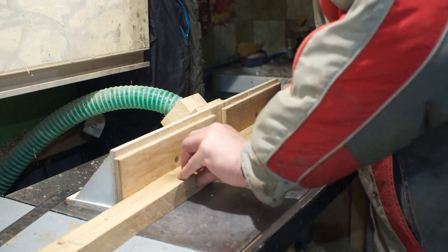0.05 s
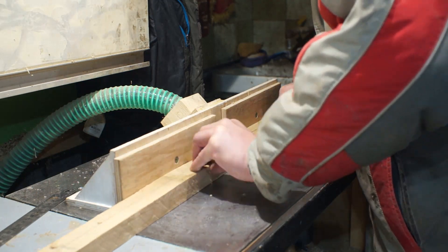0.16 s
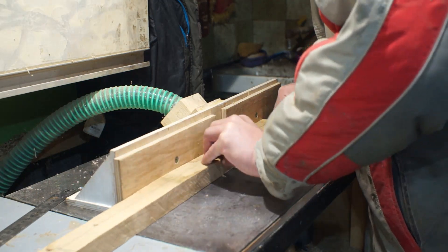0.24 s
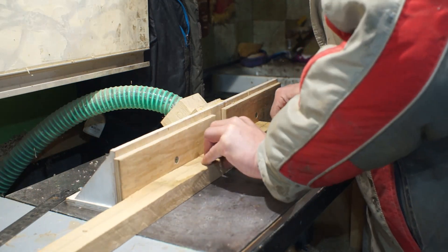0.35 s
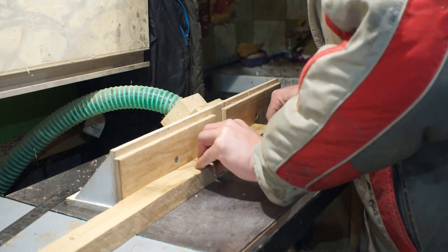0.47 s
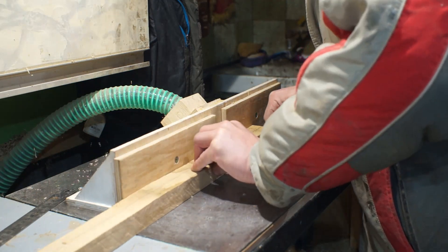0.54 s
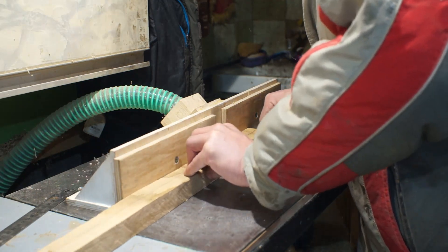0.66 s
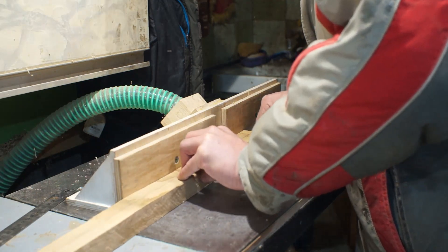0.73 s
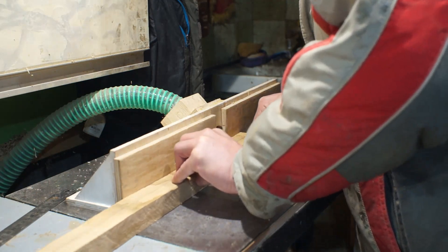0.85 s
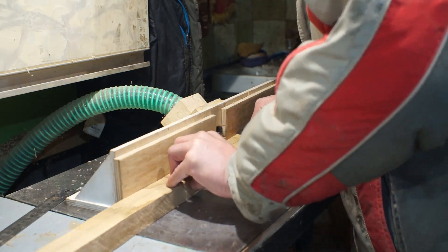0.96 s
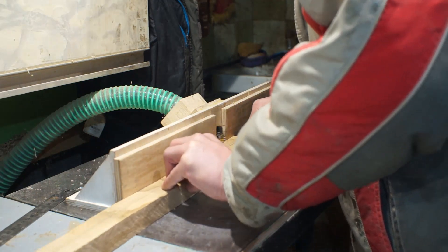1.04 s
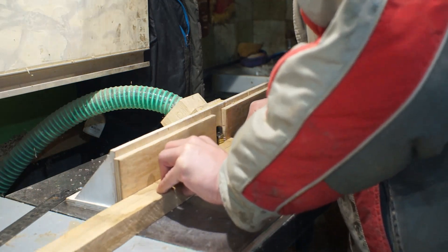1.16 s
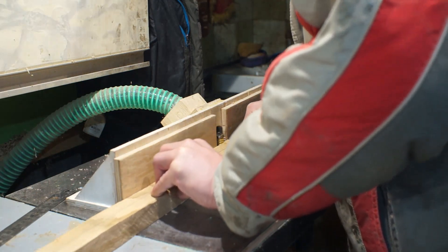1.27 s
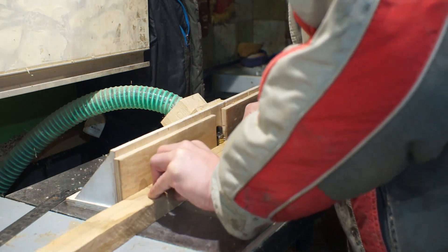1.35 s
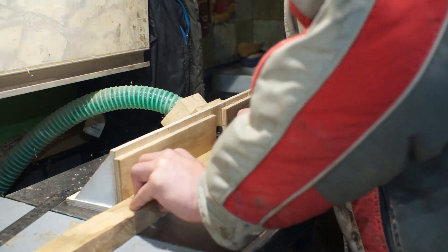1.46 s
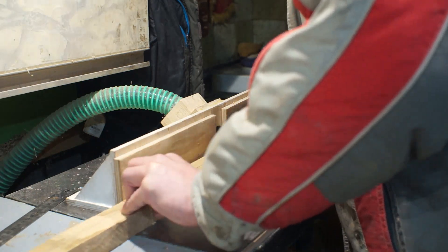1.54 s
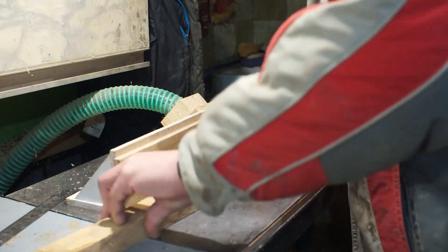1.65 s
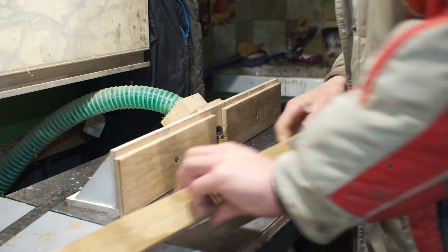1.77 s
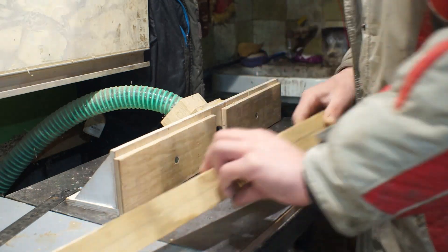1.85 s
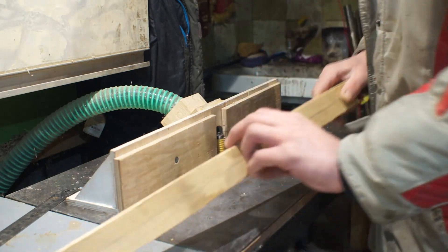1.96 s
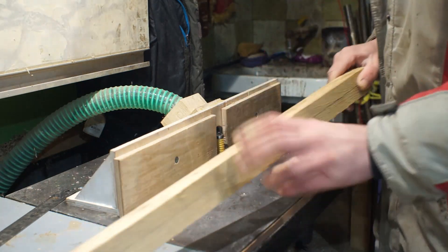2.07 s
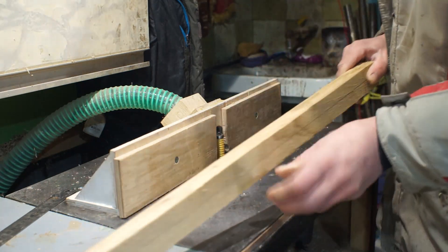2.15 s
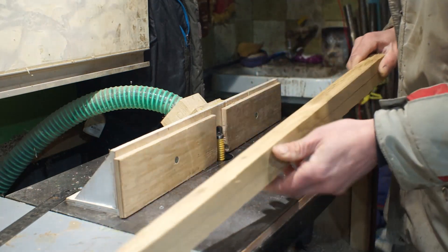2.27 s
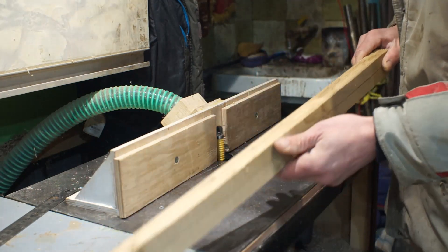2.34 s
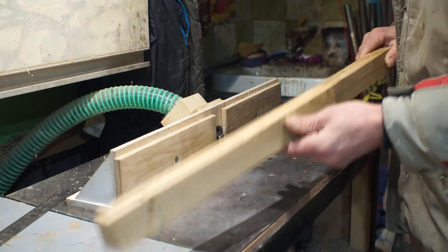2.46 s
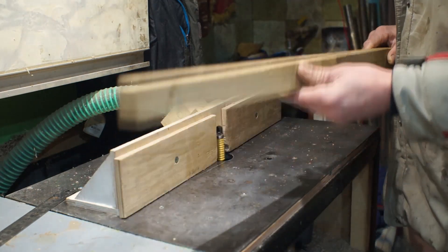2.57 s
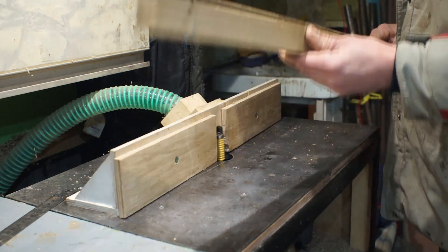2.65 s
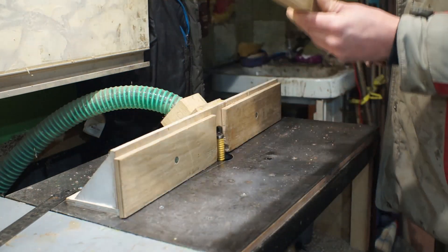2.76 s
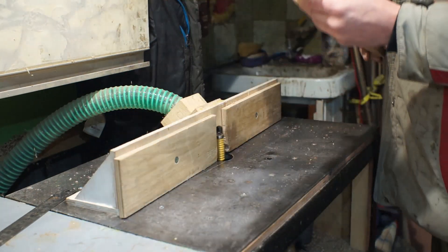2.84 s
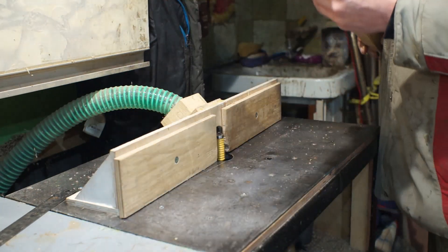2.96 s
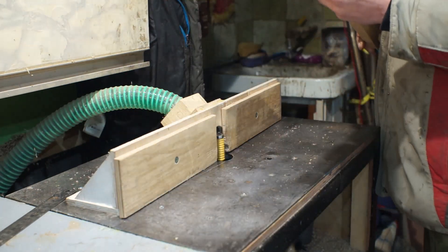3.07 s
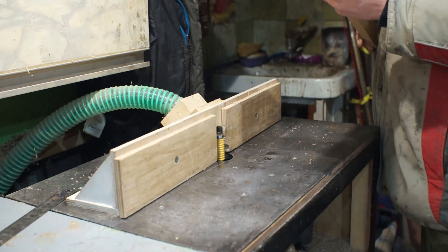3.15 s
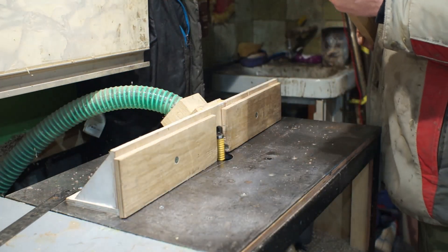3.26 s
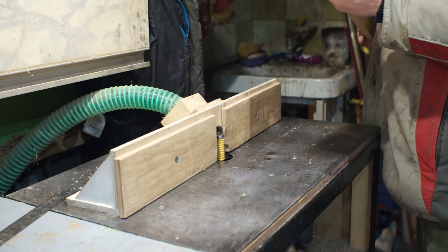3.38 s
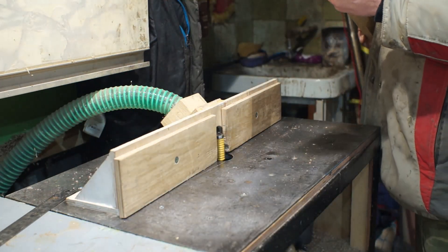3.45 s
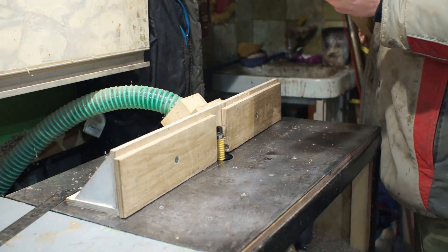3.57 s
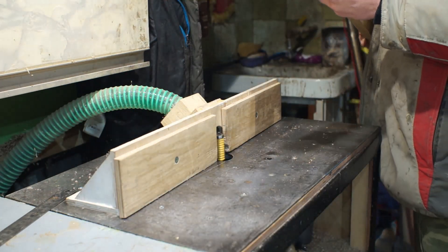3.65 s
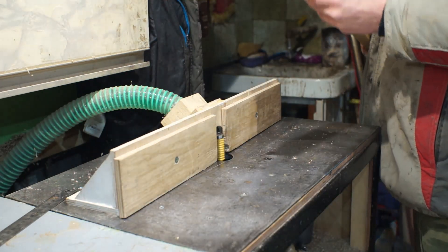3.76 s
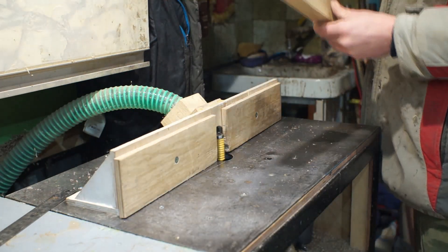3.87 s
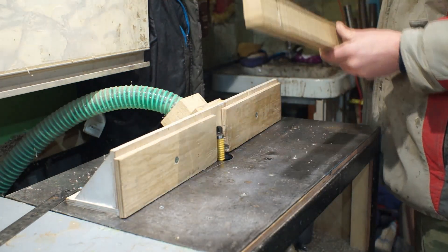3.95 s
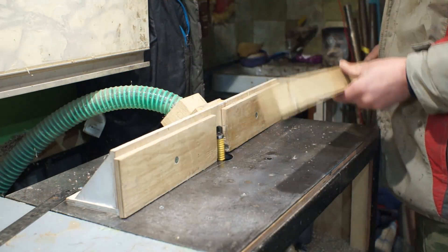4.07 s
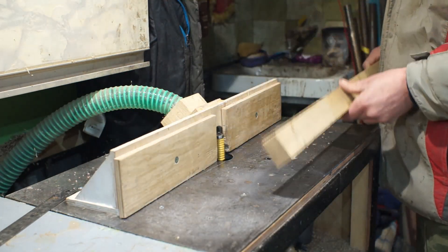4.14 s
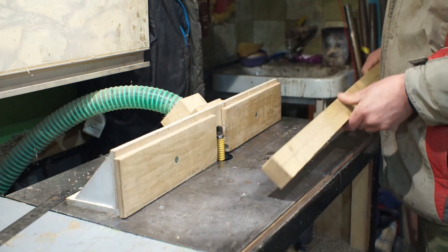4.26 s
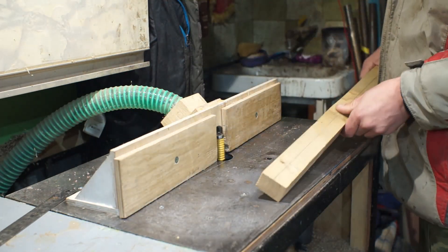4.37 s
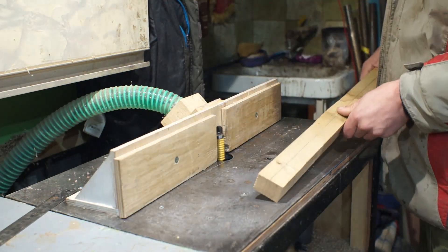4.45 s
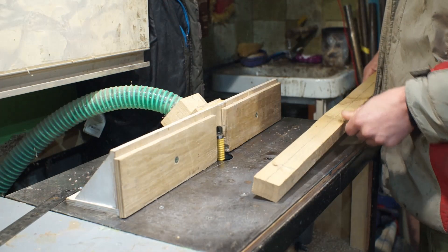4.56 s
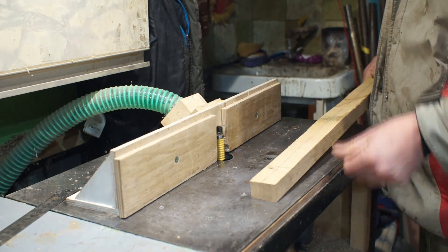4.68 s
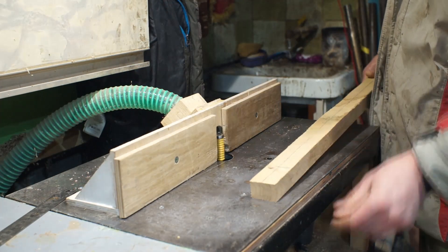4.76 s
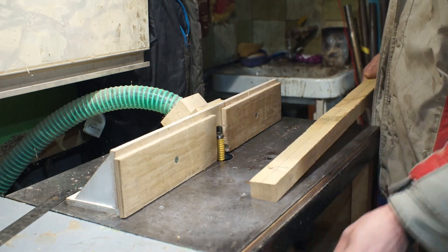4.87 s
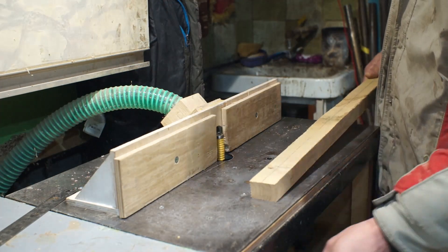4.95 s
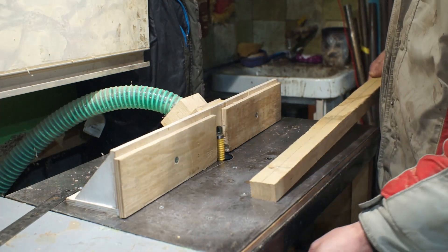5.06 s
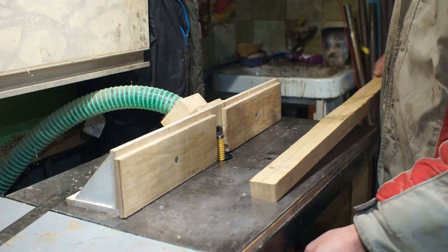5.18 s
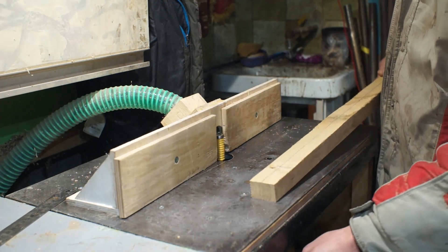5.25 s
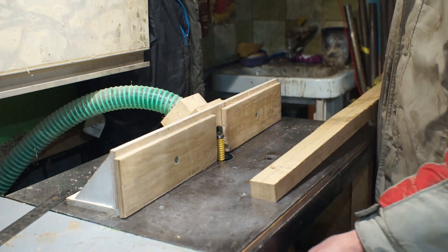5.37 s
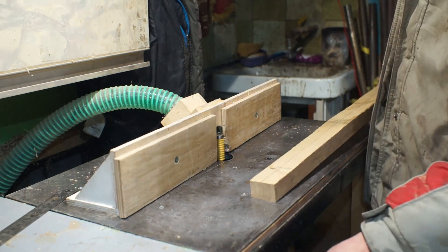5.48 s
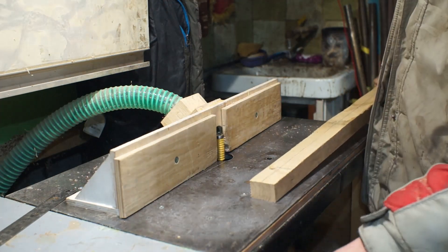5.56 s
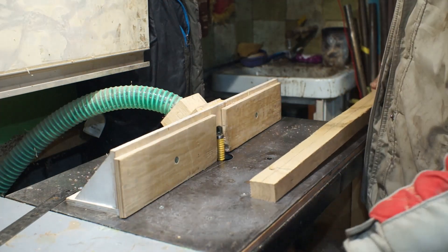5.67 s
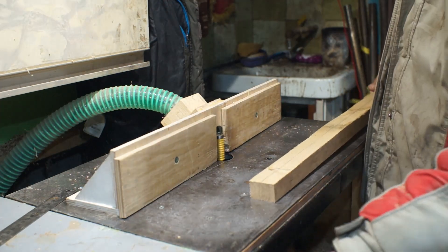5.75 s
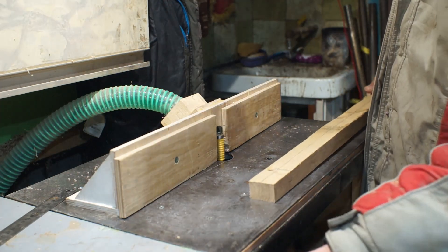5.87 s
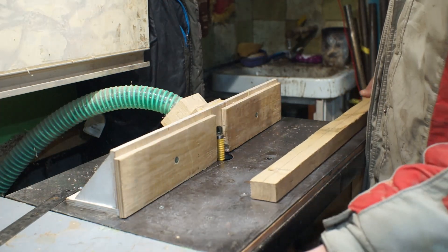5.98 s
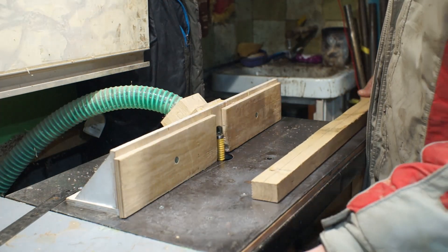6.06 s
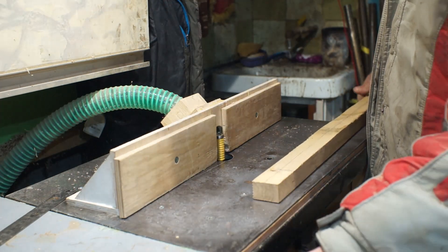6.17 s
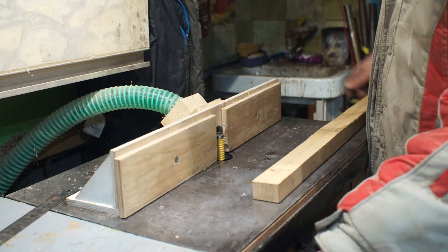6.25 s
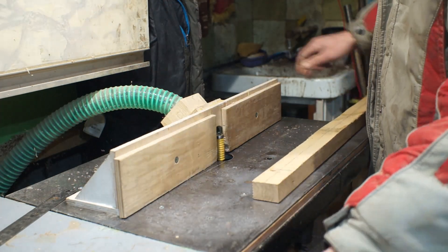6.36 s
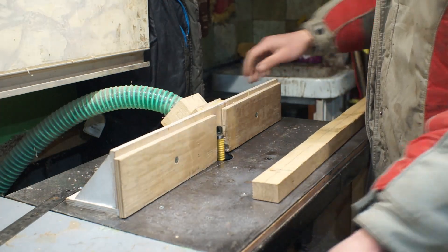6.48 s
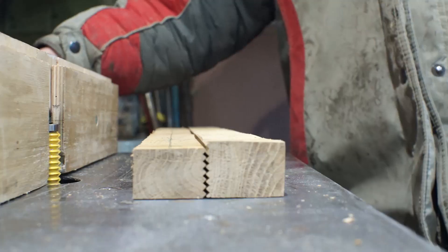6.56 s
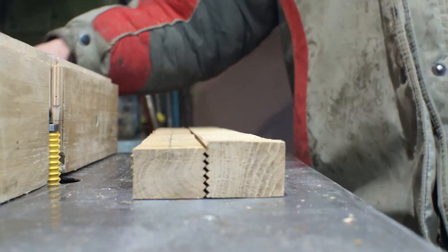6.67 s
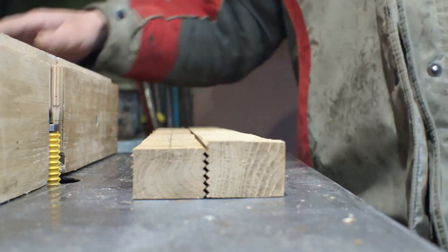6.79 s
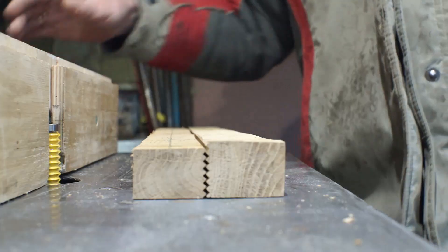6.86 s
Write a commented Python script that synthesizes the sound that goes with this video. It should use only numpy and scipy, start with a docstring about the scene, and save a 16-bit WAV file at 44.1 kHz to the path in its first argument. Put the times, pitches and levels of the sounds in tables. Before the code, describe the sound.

From 0 to about 1.45 s a table router cuts a wooden strip at close range: a dense buzzing motor tone, strained and wavering, with coarse rasp, hissing chips and bouts of growling or squealing chatter, the strongest around 0.5 to 0.9 s, and harder digs near 0.9 and 1.05 s. The strip rings brighter towards its end. The wood then clears and the pitch quickly rises to a steady, slightly fluttering whine with rushing air and a dust extractor's hum. The wide stereo image narrows at about 1.8 s. This free running holds until 5.43 s, when the router is switched off and its pitch glides down, swelling and shuddering through resonances; the extractor begins falling too at 6.2 s. At 6.53 s the machines stop abruptly. In a quiet, softly noisy workshop, wood scrapes from about 6.6 s and two strips knock together near 6.9 s.

```python
"""In a workshop, a table router with a finger-joint bit mills a wooden strip, runs free at about 20 500 rpm,
and is switched off. Overtones of one shaft make its voice: the cut slows it, and coasting sweeps it past
the table's resonances. Shaped noise and knife blows make the rasp and chips; the strip rings and chatters.
A dust extractor hums alongside. The sound is wide at first, then narrow. It cuts abruptly from the coasting
machines to a quiet workshop, where two strips slide together as scraping noise with knocks."""
import sys
import numpy as np
from scipy import signal
from scipy.fft import rfft, irfft
from scipy.io import wavfile

SR = 44100
rng = np.random.default_rng(int(sys.argv[2]) if len(sys.argv) > 2 else 0)


def generate_wav(signal):
    """Clip the signal to [-1, 1] and save it as 16-bit WAV at the path in sys.argv[1]."""
    frames = np.transpose(np.atleast_2d(signal))
    scaled = np.clip(frames, -1, 1) * 32767
    pcm = np.round(scaled).astype(np.int16)
    wavfile.write(sys.argv[1], SR, pcm)


N = 305172
TIME = np.arange(N) / SR
FREQS = np.arange(N // 2 + 1) * SR / N

NARROW_S = 1.791  # the sound is narrow from here
SCENE_CUT_S = 6.527  # the scene cuts from the machines to the quiet room here
WIDE = np.clip((NARROW_S - TIME) / .0003, 0, 1)  # 1 while wide, 0 while narrow
OFF_S, COAST_S = 5.43, 1.956  # the router is switched off; time constant of its run-down
POWERED = np.interp(TIME, [OFF_S, OFF_S + .03], [1, 0])
RIPPLE_HZ = 100  # the pulsing of the mains power
MAINS = 2 * np.pi * RIPPLE_HZ * TIME
FREE_HZ, FULL_LOAD_HZ = 342.5, 302.5  # shaft turns per second, running free and in a heavy cut
CLEAR_S, RECOVER_S = 1.447, .048  # the wood leaves the bit; time constant of the speed-up
EXIT_RELEASE_S = 0.0091  # time constant with which the cutting sound dies away
DIG_ATTACK_S, DIG_RELEASE_S, DIG_SWELL_DB = 0.053, .035, 7  # each dig also swells the second order


def undb(db):
    """Turn decibels into gain."""
    return 10 ** (np.asarray(db) / 20)


def curves(table):
    """Draw each column of a table as a line through time."""
    s, *columns = np.transpose(table)
    return [np.interp(TIME, s, c) for c in columns]


def unit(x):
    """Scale to rms 1."""
    return x / np.sqrt(np.mean(x ** 2))


def walk(rate):
    """Wander smoothly at random, with a spread a little under 1, changing about rate times a second."""
    at = TIME * rate
    return 0.94 * np.interp(at, np.arange(4096), rng.standard_normal(4096))


def after(s, time_constant):
    """Stay at 1 until the moment s, then die away."""
    return np.exp(-np.maximum(TIME - s, 0) / time_constant)


def bursts(table, attack, release):
    """Gain of a row of events that each rise, hold and die away."""
    out = 0
    for s, length, db in table:
        rise = np.clip((TIME - s) / attack, 0, 1)
        out = out + undb(db) * rise * after(s + length, release)
    return out


def colour(x, spectrum):
    """Give a white signal of rms 1 a spectrum in dB per Hz."""
    hz, db = np.transpose(spectrum)
    gain = undb(np.interp(np.log(FREQS + 1), np.log(hz), db))
    return irfft(rfft(x) * gain * np.sqrt(SR / 2), N)


def ears(side_db):
    """White noise for two ears: unrelated while the sound is wide, more alike afterwards."""
    mid, side = rng.standard_normal((2, N))
    width = WIDE + (1 - WIDE) * undb(side_db)
    return (mid + np.array([[1], [-1]]) * width * side) / np.sqrt(1 + width ** 2)


def scatter(x, t60):
    """Dense reflections off table and fence, different for each ear, dying by 60 dB in t60 seconds."""
    t = TIME[:8192]
    echoes = rng.standard_normal((2, len(t))) * np.exp(-np.log(1000) * t / t60)
    echoes /= np.sqrt(np.sum(echoes ** 2, axis=1, keepdims=True))
    return signal.fftconvolve(x[None], echoes, axes=1)[:, :N]


def tone(turns, db, wide_lag, narrow_lag=1.0):
    """One pure tone whose phase differs between the ears by a lag in radians."""
    lag = WIDE * wide_lag + (1 - WIDE) * narrow_lag
    phase = 2 * np.pi * turns
    return np.sqrt(2) * undb(db) * np.array([np.cos(phase - lag), np.cos(phase)])


def standing_waves(hz, spacing_hz=40, depth_db=5.0, drift_db=4.0):
    """Level in dB of a tone in the room: it drifts, and flutters as it glides past peaks and dips."""
    peaks = np.clip(rng.standard_normal(2048), -1.6, 1.6)
    gliding = np.interp(TIME, [1.5, 1.6, 5.43, 5.46], [1, 0, 0, 1])  # no flutter while running free
    flutter = np.interp(hz / spacing_hz, np.arange(2048), peaks)
    return gliding * depth_db * flutter + drift_db * walk(7)


# how fast the shaft turns while cutting: (time [s], speed [turns per second])
CUTTING_SPEED = [(0, 305.3), (.14, 308.7), (.27, 318.5), (.4, 310.1), (.55, 301.5), (.79, 300.6),
                 (.86, 306), (1, 298.9), (1.13, 301.4), (1.45, 301.3)]
# how fast the shaft turns while running free: (time [s], speed [turns per second])
RUNNING_FREE_SPEED = [(2.42, 342.7), (2.67, 341.3), (3.05, 344), (3.3, 345), (3.76, 341.6), (4.1, 343.1),
                      (4.35, 343), (5.1, 343.6), (5.43, 344.5)]


def shaft():
    """Speed [Hz], load (about 0-1) and free drift [Hz]: the cut drags it, it recovers, then coasts."""
    (cut_hz,), (free_hz,) = curves(CUTTING_SPEED), curves(RUNNING_FREE_SPEED)
    drag_hz = (free_hz - cut_hz) * after(CLEAR_S, RECOVER_S)
    hz = (free_hz - drag_hz) * after(OFF_S, COAST_S)
    load = drag_hz / (FREE_HZ - FULL_LOAD_HZ)
    drift = (free_hz - FREE_HZ) * POWERED
    return hz, load, drift


CRITICAL_HZ, CRITICAL_WIDTH_HZ = 272, 28  # the slowing shaft shakes the table around this speed


def shudder(hz):
    """How near the coasting shaft is to its critical speed, 0-1."""
    return (1 - POWERED) * np.exp(-((hz - CRITICAL_HZ) / CRITICAL_WIDTH_HZ) ** 2)


# shaft orders 1 to 6, before the table lifts them: (level [dB], change at full load [dB],
# change at the critical speed [dB], change with speed drift [dB per Hz])
LOW_ORDER_LEVELS = [(-49.5, -2, 3, 0.16), (-52.5, -4, -1.5, 0.7), (-56, -9, 3.5, .3), (-61.5, 4, 9.5, 1.5),
                    (-59.5, 1, 5, 1.9), (-61, -2, 4, -1.3)]
# resonances of table and fence that the orders sweep through: (frequency [Hz], width [Hz], level [dB])
TABLE_RESONANCES = [(252.7, 9, 18), (335.4, 30, 22), (415, 10, 16.4), (457, 18, 15.5), (508.2, 9.1, 19),
                    (571.5, 35, 16), (771, 55, 19), (818, 24, 13), (888, 29, 18), (1189, 27, 11),
                    (1285, 79, 12.5), (1448, 19, 13.5), (1777, 95, 18.5), (2046, 46, 20.5)]
# dips between them, and a few small lifts: (frequency [Hz], width [Hz], change [dB])
TABLE_DIPS = [(207.2, 7.2, -2), (282.5, 10, -6.5), (390, 14, -15), (492, 8.7, -12), (640, 26, 1),
              (1028, 51, -4), (1380, 32, 1)]


def low_levels(hz, load, drift):
    """Level in dB of each low order: its own strength, lifted by the resonance that it is passing."""
    grid = np.arange(4096)  # Hz
    power = 1
    for centre, width, db in TABLE_RESONANCES:
        power = power + undb(db) ** 2 / (1 + (2 * (grid - centre) / width) ** 2)
    lift_db = 10 * np.log10(power)
    for centre, width, db in TABLE_DIPS:
        lift_db += db / (1 + (2 * (grid - centre) / width) ** 2)
    shake = shudder(hz)
    levels = []
    for order, (db, load_db, shake_db, drift_db) in enumerate(LOW_ORDER_LEVELS, 1):
        own_db = db + load_db * load + shake_db * shake + drift_db * drift
        levels.append(own_db + np.interp(order * hz, grid, lift_db))
    digging = np.minimum(bursts(BIT_DIGS, DIG_ATTACK_S, DIG_RELEASE_S), 1)
    levels[1] = levels[1] + DIG_SWELL_DB * digging
    return levels


def hum(turns, db, throb=0.05, waver_db=0.83):
    """The shaft's unbalance shakes the table once a turn."""
    once_a_turn = tone(turns, db + waver_db * walk(25), wide_lag=2.24, narrow_lag=0.66)
    return once_a_turn * (1 + throb * POWERED * np.cos(MAINS))


# higher multiples of the shaft speed, with lines drawn between: (order)
HIGH_ORDERS = [7, 9, 10, 11, 12, 13, 14, 15, 16, 17, 19, 24, 31]
# their levels before load and room change them: (level [dB])
HIGH_ORDER_LEVELS = [-53, -53, -54, -56.5, -54, -56.5, -58.5, -62, -71, -60, -66, -70.5, -103]


def motor(turns, hz, load, levels, shimmer_db=0.98, strain_db=3.0, smear=0.03, judder=0.058,
          load_sway=0.018, throb=0.05, load_db=6.0, shudder_db=3, dip_db=0.82, lag_per_order=.22,
          bite_share=0.42, db_per_octave=5.5, wander_db=.9):
    """Overtones of the shaft judder under load, and the heavier current sways them with the mains."""
    turns = turns + load_sway * load * np.sin(MAINS)
    buzz_db = (load_db + bite_share * curves(KNIFE_BITE)[0]) * load * after(CLEAR_S, EXIT_RELEASE_S)
    buzz_db += shudder_db * shudder(hz) + db_per_octave * np.log2(hz / FREE_HZ)
    out = 0
    for order, db in enumerate(levels, 2):
        room_db = standing_waves(order * hz, spacing_hz=14, depth_db=dip_db * order, drift_db=-0.5)
        coasting_db = (1 - POWERED) * room_db
        flutter_db = (shimmer_db + strain_db * load) * walk(22) + wander_db * walk(2.97) + coasting_db
        shaky_turns = order * turns + rng.random() + judder * load * walk(60)
        out += tone(shaky_turns, db + flutter_db, wide_lag=1.02 + lag_per_order * order, narrow_lag=0.49)
    for order in range(HIGH_ORDERS[0], HIGH_ORDERS[-1] + 1):
        swell_db = buzz_db * min(1, 12 / order)  # the table shakes mostly at the lower orders
        db = np.interp(order, HIGH_ORDERS, HIGH_ORDER_LEVELS) + swell_db + standing_waves(order * hz)
        blur = (smear + judder * load) * walk(70)
        out += tone(order * turns + rng.random() + blur, db, rng.uniform(-np.pi, np.pi), narrow_lag=0.66)
    return out * (1 + throb * POWERED * np.cos(MAINS))


FAN_DB, FAN_DB_PER_HZ = -56, 4  # whistle of the motor's 16-blade fan, louder as the speed drifts up
# multiples of the shaft speed sung by the motor's commutator: (order)
COMMUTATOR_ORDERS = [32, 48]
# their levels before load and room change them: (level [dB])
COMMUTATOR_LEVELS = [-59, -80]


def rotor(turns, hz, load, drift, flicker_db=2.5, fan_load_db=-10, fan_coast_db=-6, bars_load_db=2):
    """The fan whistles, most at full speed, and the commutator bars sing under the brushes."""
    fan_db = FAN_DB + FAN_DB_PER_HZ * drift
    fan_db = fan_db + fan_load_db * np.minimum(3 * load, 1) + fan_coast_db * (1 - POWERED)
    out = tone(16 * turns, fan_db + flicker_db * walk(18), wide_lag=1.6, narrow_lag=.3)
    for order, db in zip(COMMUTATOR_ORDERS, COMMUTATOR_LEVELS):
        fade_db = standing_waves(order * hz, spacing_hz=69.24, depth_db=8, drift_db=5.5)
        bars_db = db + fade_db + bars_load_db * load
        out += tone(order * turns, bars_db, wide_lag=1.194, narrow_lag=0.036)
    return out


# colour of the rushing air, before the flow changes its level: (frequency [Hz], level [dB per Hz])
AIR_COLOUR = [(30, -101), (100, -96), (175, -94.5), (240, -82.5), (450, -81), (800, -79), (1200, -78),
              (1900, -79), (2700, -74.5), (3600, -79.5), (5500, -81.5), (8000, -83), (11000, -88),
              (15000, -94)]


def air(turns, hz, free_db=-2.0, db_per_octave=2.5, shudder_db=1.0, throb=0.12, chop=0.1, flicker_db=1.15):
    """Cooling air and brush hiss follow the speed, pulse with the mains and are chopped once a turn."""
    flow_db = free_db + db_per_octave * np.log2(hz / FREE_HZ) + shudder_db * shudder(hz)
    pulse = 1 + throb * POWERED * np.cos(MAINS) + chop * np.cos(2 * np.pi * turns)
    return colour(ears(side_db=-42) * pulse, AIR_COLOUR) * undb(flow_db + flicker_db * walk(25))


EXIT_DB, EXIT_RISE_DB_PER_S = -35, 19  # the strip rings ever louder towards its end
# how hard the knives bite; the motor's buzz follows too: (time [s], level [dB])
KNIFE_BITE = [(0, 1.5), (.18, -2.5), (.28, -7), (.44, -2.5), (.55, 0.5), (.72, -5.5), (1.17, -5.5),
              (1.25, -6), (1.45, -8)]
# the bit digs in and throws chips; also swells order 2: (start [s], length [s], level [dB])
BIT_DIGS = [(0, 0.14, -0.5), (.32, .18, 0.5), (.88, 0.17, 3), (1.04, .08, 5)]
# colour of the rasp, before the bite changes its level: (frequency [Hz], level [dB per Hz])
RASP_COLOUR = [(30, -103), (120, -82.5), (240, -81.5), (450, -67), (640, -73), (840, -64.5), (1100, -78.5),
               (1550, -69), (2000, -70.5), (2500, -71.5), (3000, -77), (4200, -77), (6000, -87),
               (12000, -102)]
# colour of the flying chips, before the spray changes their level: (frequency [Hz], level [dB per Hz])
CHIP_COLOUR = [(2000, -105), (5000, -91), (8000, -83), (11000, -89.5), (15000, -95)]
# ways the strip's end rings, relative to each other: (frequency [Hz], width [Hz], level [dB])
STRIP_MODES = [(803.3, 20.8, 7), (1110, 50, 1), (2940, 33, 12), (3056, 37.8, 10), (3313, 45, -1),
               (3950, 55, 6)]


def cutting(turns, sharpness=120, uneven_db=2.0, tear=0.95, grain_db=2.0, dust_db=-7):
    """A knife strikes once a turn, each bite of its own size; fibres tear, chips fly, the strip rings."""
    bite_db, = curves(KNIFE_BITE)
    spray = undb(bite_db + dust_db) + bursts(BIT_DIGS, DIG_ATTACK_S, DIG_RELEASE_S)
    exit_db = EXIT_DB - EXIT_RISE_DB_PER_S * np.maximum(CLEAR_S - TIME, 0)
    sizes = undb(uneven_db * rng.uniform(-2.8, 2.9, 4096))[(turns + .5).astype(int)]
    contact = np.cos(2 * np.pi * turns) - 1  # 0 at the strike, negative elsewhere
    blows = unit(np.diff(sizes * np.exp(sharpness * contact), prepend=0))
    fibres = unit(rng.standard_normal((2, N)) * sizes * np.exp(contact))
    rasp = colour(tear * fibres + undb(-7.0) * scatter(blows, t60=0.11), RASP_COLOUR) * undb(bite_db)
    grains = unit(rng.standard_normal((2, N)) * undb(grain_db * walk(420)))
    chips = colour(grains, CHIP_COLOUR) * spray
    modes = sum(undb(db) / (1 + 2j * (FREQS - hz) / width) for hz, width, db in STRIP_MODES)
    struck = scatter(blows, t60=0.017) + 1.62 * fibres
    ring = unit(irfft(rfft(struck) * modes, N)) * undb(exit_db)
    return (rasp + chips + ring) * after(CLEAR_S, EXIT_RELEASE_S)


CHATTER_ATTACK_S, CHATTER_RELEASE_S = 0.017, .025
# bouts of chatter at a multiple of the shaft speed: (start [s], length [s], multiple, level [dB])
CHATTER_BOUTS = [(0, 0.12, 6, -42), (0, 0.23, 10, -48), (0.118, 0.24, 5, -45), (0.156, 0.28, 7, -43),
                 (.39, .13, 6.5, -42), (0.456, 0.22, 3, -40), (0.465, 0.17, 4, -44),
                 (0.524, 0.32, 6.5, -33.5), (.52, 0.4, 1.5, -54.5), (0.851, .1, 6.5, -35.5),
                 (0.945, 0.16, 1.5, -45), (1.12, 0.07, 1.5, -50), (1.158, 0.24, 2, -47),
                 (1.219, .22, 9.5, -49.5), (1.27, .18, 10, -43), (1.29, 0.11, 11, -46)]


def chatter(turns, rough_db=1.5, jitter=0.022):
    """The strip bounces on the bit, growling at low multiples and squealing at high ones, unsteadily."""
    out = 0
    for s, length, multiple, db in CHATTER_BOUTS:
        order = round(2 * multiple) / 2  # it locks to whole or half orders
        shaky_turns = order * turns + rng.random() + jitter * walk(110)
        voice = tone(shaky_turns, rough_db * walk(110), wide_lag=0.89)
        out = out + voice * bursts([(s, length, db)], CHATTER_ATTACK_S, CHATTER_RELEASE_S)
    return out


EXTRACTOR_HZ, EXTRACTOR_OFF_S, EXTRACTOR_COAST_S = 511.6, 6.2, 2.3
# how loud the dust extractor's blade tone is: (time [s], level [dB])
EXTRACTOR_LOUDNESS = [(0, -51), (.4, -40), (.9, -49), (1.4, -49.5), (1.7, -42), (2.1, -49), (5.4, -47.5),
                      (6.2, -39.5), (6.5, -48)]


def extractor():
    """The blade tone of the dust extractor falls in pitch as it too runs down."""
    hz = EXTRACTOR_HZ * after(EXTRACTOR_OFF_S, EXTRACTOR_COAST_S)
    db, = curves(EXTRACTOR_LOUDNESS)
    turns = np.cumsum(hz) / SR + 0.011 * walk(10)
    return tone(turns, db + 0.86 * walk(10), wide_lag=1.5, narrow_lag=0.92)


# strips pushed over the table, relative to the scrape's colour: (start [s], length [s], level [dB])
STRIP_SLIDES = [(6.5, .03, -6), (6.63, .2, -1.5), (6.85, .08, 1.5)]
# the strips knock together, relative to the scrape's colour: (time [s], level [dB])
STRIP_KNOCKS = [(6.897, -5), (6.905, 10)]
# colour of wood scraping on the table: (frequency [Hz], level [dB per Hz])
SCRAPE_COLOUR = [(100, -118), (300, -108), (500, -99), (900, -99), (1700, -91.5), (2700, -97.5),
                 (5500, -97), (11000, -97.5), (15000, -101)]


def strips(knock_t60=0.023):
    """Wood slides over the table in small catches, then the two joints meet."""
    force = bursts(STRIP_SLIDES, attack=0.027, release=0.12) * undb(0.88 * walk(160))
    for s, db in STRIP_KNOCKS:
        fade = np.exp(-np.log(1000) * np.abs(TIME - s) / knock_t60)
        force = force + undb(db) * (TIME >= s) * fade
    return colour(ears(side_db=-13.5) * force, SCRAPE_COLOUR)


# colour of the workshop's quiet background: (frequency [Hz], level [dB per Hz])
WORKSHOP_COLOUR = [(30, -123), (150, -110), (330, -98.5), (600, -99), (1200, -104), (3600, -106),
                   (8000, -110), (15000, -113)]


def workshop():
    """Steady soft noise fills the room."""
    return colour(ears(side_db=-11.0), WORKSHOP_COLOUR)


def scene(sway=0.005, flutter=0.0015):
    """One shaft drives the whole router; mains torque ripple sways it until the power goes off."""
    hz, load, drift = shaft()
    hum_db, *overtones_db = low_levels(hz, load, drift)
    turns = np.cumsum(hz) / SR + sway * POWERED * np.sin(MAINS) + flutter * walk(30)
    router = hum(turns, hum_db) + motor(turns, hz, load, overtones_db)
    router = router + rotor(turns, hz, load, drift) + air(turns, hz)
    machines = router + cutting(turns) + chatter(turns) + extractor()
    before_cut = np.clip((SCENE_CUT_S - TIME) / .004, 0, 1)
    return machines * before_cut + strips() * (1 - before_cut) + workshop()


TOP_HZ = 15700  # hardly any sound is left above this


def record(dry, right_db=0.2):
    """The right channel is a little louder; the top is cut steeply."""
    balance = undb(np.array([[-right_db], [right_db]]) / 2)
    low_pass = signal.ellip(14, .1, 80, TOP_HZ, fs=SR, output="sos")
    return signal.sosfilt(low_pass, dry * balance)


dry = scene()
out = record(dry)
generate_wav(out)
```